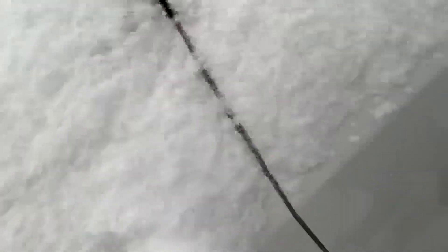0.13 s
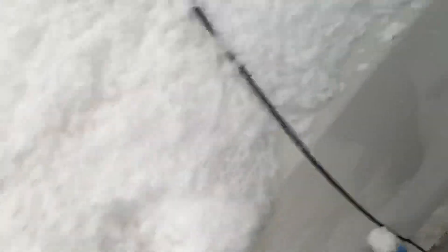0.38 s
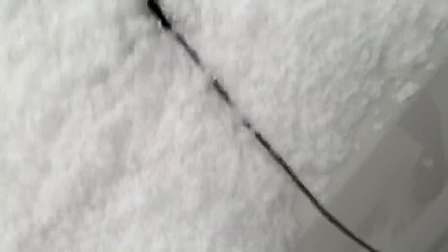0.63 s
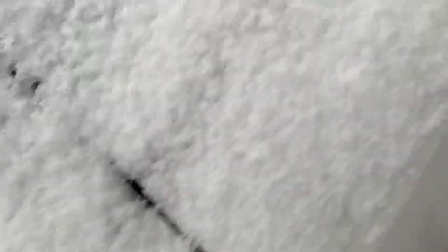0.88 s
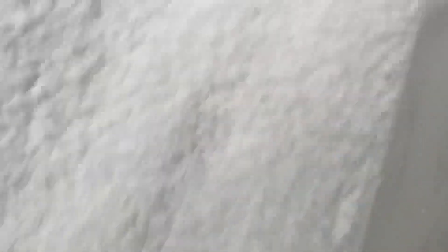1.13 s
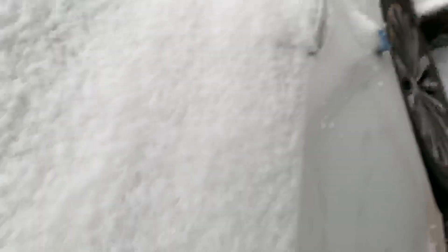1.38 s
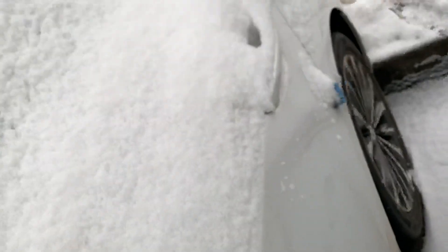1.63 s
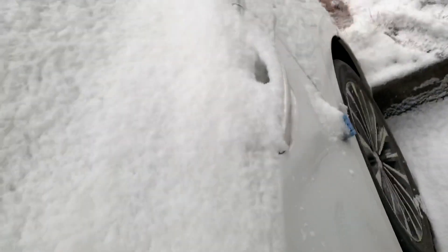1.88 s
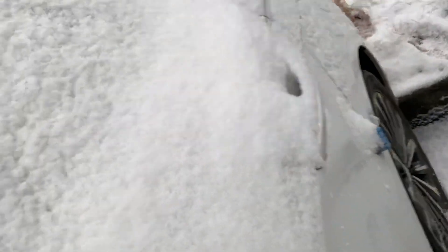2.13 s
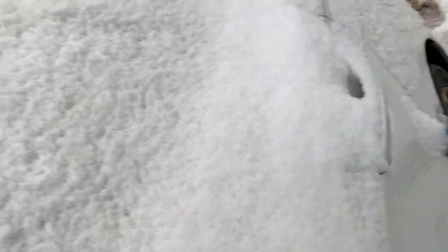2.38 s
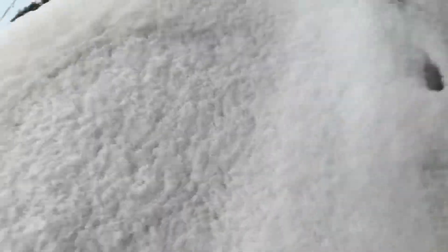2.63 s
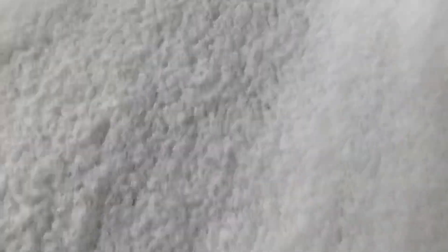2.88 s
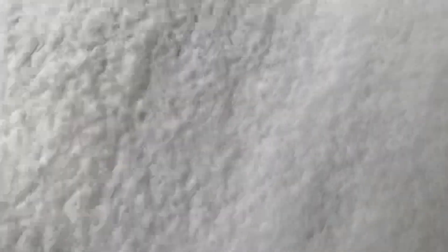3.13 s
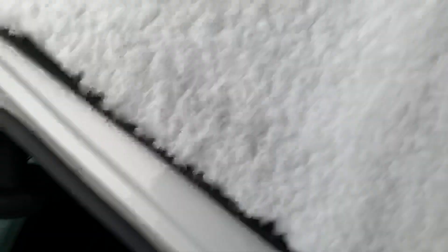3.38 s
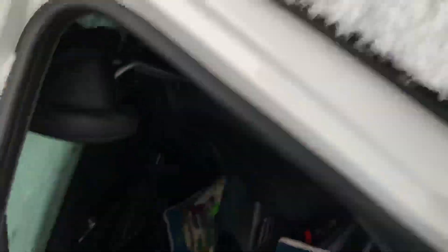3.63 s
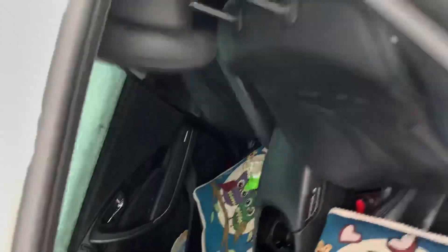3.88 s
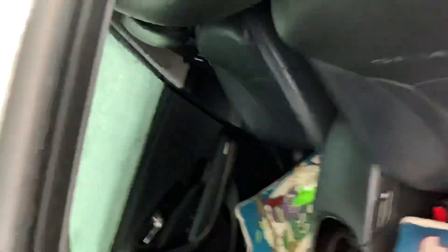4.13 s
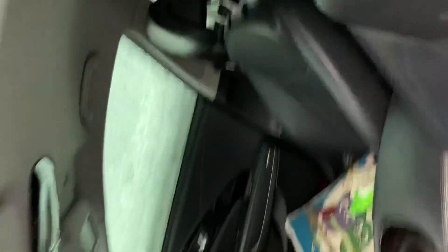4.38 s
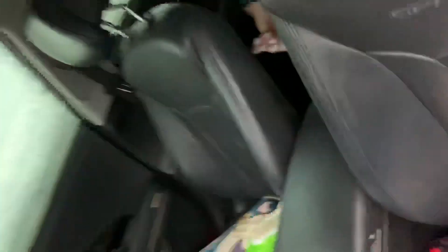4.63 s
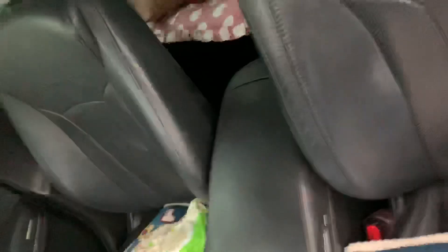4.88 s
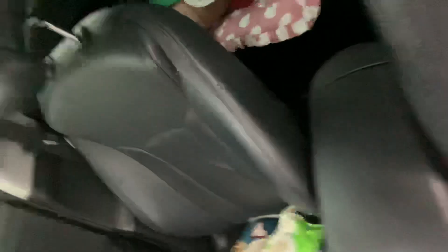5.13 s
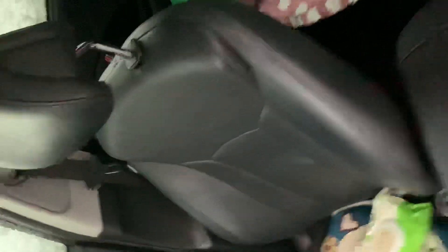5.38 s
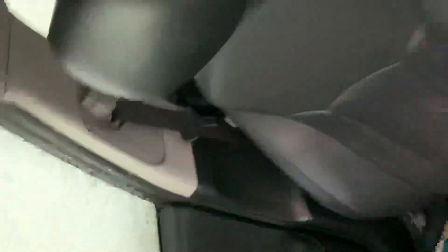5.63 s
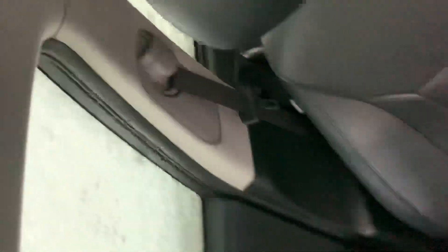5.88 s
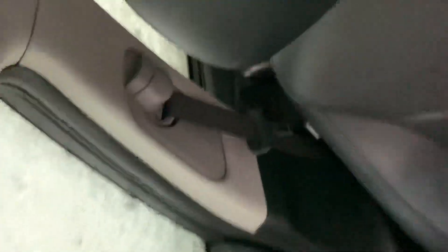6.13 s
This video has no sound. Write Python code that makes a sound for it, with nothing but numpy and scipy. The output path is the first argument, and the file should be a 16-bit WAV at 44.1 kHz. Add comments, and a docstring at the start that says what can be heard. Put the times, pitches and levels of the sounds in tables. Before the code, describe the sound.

Frozen car door pops loose with a loud crack and thump, then cloth rustling, faint clicks, and later two more dull, heavy thuds.

```python
"""Beside a frosted car, a hand-held phone hears the door knocked and cracking free of its icy seal.
Ice, snow and latch make bursts of crackle that ring the door's trim and panel.
The car body rings in deep thumps, some built from several parts.
A winter jacket rustles (shaped noise with a moving colour) over a far low rumble (noise in low resonances)."""
import sys
import numpy as np
from scipy import signal
from scipy.fft import rfft, irfft
from scipy.io import wavfile
from scipy.ndimage import uniform_filter1d, map_coordinates

SR = 44100
rng = np.random.default_rng(int(sys.argv[2]) if len(sys.argv) > 2 else 0)


def generate_wav(signal):
    """Clip the signal to [-1, 1] and save it as 16-bit WAV at the path in sys.argv[1]."""
    frames = np.transpose(np.atleast_2d(signal))
    scaled = np.clip(frames, -1, 1) * 32767
    pcm = np.round(scaled).astype(np.int16)
    wavfile.write(sys.argv[1], SR, pcm)


def invert_db(level):
    """Linear amplitude ratio for a level in decibels (20 dB per decade), elementwise."""
    return 10 ** (np.asarray(level, dtype=float) / 20)


N = 275757  # samples in the scene

# far rumble before it wavers: t/s, low level/dB, upper murmur level/dB
RUMBLE = [(0.0, -38, -50), (1.06, -39.5, -51), (1.44, -43.5, -47), (1.67, -39.5, -44), (1.83, -32.5, -41),
          (2.16, -39.5, -52), (3.93, -42, -47.5), (4.42, -45, -50), (4.77, -45, -56), (5.36, -47.5, -54.5),
          (5.52, -44, -53), (6.25, -48.5, -65)]
# resonances of the low rumble: f/Hz, width/Hz, level/dB
RUMBLE_PEAKS = [(34.1, 24, -1.5), (56.9, 11, 10.5), (96, 62, -0.5), (137, 53, -12)]
# resonances of the upper murmur: f/Hz, width/Hz, level/dB
MURMUR_PEAKS = [(190.4, 106, -0.5), (317, 180, -6.5), (454.5, 114, -3)]
# jacket before it flickers: t/s, rubbing level/dB, dull folds over swish/dB, bright hiss level/dB
JACKET = [(0.0, -56, 2, -63), (0.28, -48.5, -15.5, -55), (0.42, -54.5, -1, -66), (0.58, -48, -4.5, -48),
          (0.71, -49.5, -5.5, -55), (0.78, -47, -6, -55), (0.92, -53.5, -8.5, -55), (1.06, -59, 1, -56),
          (1.22, -64, 3.5, -73), (1.64, -66.5, 6.5, -66.5), (1.76, -46, 6.5, -82), (1.98, -61.5, -2, -53),
          (2.65, -58, -2, -53.5), (2.87, -66, 6.5, -70), (3.3, -50.5, -5, -56.5), (3.45, -50.5, -5, -51.5),
          (3.69, -51, -7.5, -59.5), (4.09, -53.5, -2.5, -57.5), (4.46, -49.5, -1, -43.5),
          (4.74, -57.5, -3.5, -62), (5.15, -57.5, -2.5, -65.5), (5.22, -57, 7, -55.5),
          (5.36, -52, -6.5, -63), (5.46, -45.5, 1.5, -54), (5.66, -51.5, -4, -78), (5.86, -49, 0, -76),
          (6.02, -53.5, -5, -71), (6.25, -66, -8, -67)]
# colour of the dull folds: f/Hz, relative level/dB per Hz
FOLDS_COLOUR = [(400, -0.5), (700, 7.5), (1500, 0), (2500, -4), (5000, -29.5), (9000, -47)]
# colour heard in the swish, with a steep end near 14.5 kHz that is not the cloth's own:
# f/Hz, relative level/dB per Hz
SWISH_COLOUR = [(1200, -14), (2500, -8.5), (4500, -6.5), (6500, -5), (7500, -9.5), (11000, -9.5),
                (13500, -7), (14400, -17), (14800, -49.5)]
# colour heard in the hiss, its steep top end not the cloth's own either: f/Hz, relative level/dB per Hz
HISS_COLOUR = [(6000, -56), (7700, -11.5), (8200, -2), (9500, -5), (10800, -10), (12000, -10),
               (14000, -54.5)]
# moving resonance of a sliding sleeve: t/s, centre f/Hz, lift/dB
SLIDE = [(0.0, 5000, -6.5), (0.55, 1960, 5), (0.62, 5170, 3.5), (0.78, 3840, 1.5), (1.2, 2900, 0.5),
         (3.4, 1190, -0.5), (3.6, 2000, 1), (3.74, 3670, 4), (4.1, 3440, 4), (4.24, 1850, -4),
         (4.38, 2120, 9), (4.44, 3900, 1), (4.6, 3320, 0.5), (5.35, 2880, 5), (5.52, 3360, 5),
         (5.68, 4000, 9.5), (5.76, 3540, 3), (5.79, 1500, 7.5), (5.949, 1930, -0.5)]
# how alike left and right are in the noises all around: f/Hz, likeness/-1 to 1
LIKENESS = [(60, 0.93), (130, 0.92), (290, 0.16), (640, -0.54), (1410, -0.28), (3100, 0.099),
            (6820, 0.0024), (15000, -0.034)]
# ticks of small latch parts, each near one pitch: t/s, peak level/dB, centre f/Hz, crackle length/ms
TICKS = [(0.0433, -17, 3900, 1), (1.4372, -12, 2670, 4), (1.4395, -11.5, 4040, 4.7),
         (1.718, -30, 1700, 2.2), (1.769, -28, 1660, 3.4), (1.795, -20, 3400, 1.1), (1.796, -23, 1980, 3.1),
         (1.819, -23, 1940, 2.7), (1.852, -27, 1490, 3), (1.898, -25, 4370, 2), (3.321, -40.5, 1240, 2),
         (3.448, -44, 1500, 5.8), (3.85, -41, 1370, 5), (4.408, -41, 1130, 2.4)]
# knocks on door and latch, and one faint dull rub on the panel (near 5 s):
# t/s, trim peak level/dB, panel over trim/dB, hardness/dB per octave, crackle length/ms
KNOCKS = [(0.0443, -18, 3.5, -12.5, 3.6), (0.355, -31, 5, -25, 3.1), (0.483, -32.5, -10, -10.5, 5.1),
          (0.611, -35, -10, -5.5, 2), (0.787, -31.5, -10, -6.5, 1.8), (1.397, -34, -7, -5, 5.9),
          (1.437, -6.5, -13, -10, 2.4), (1.4411, -15.5, 2, -14, 7.9), (1.455, -20.5, 3, -23, 15),
          (1.514, -21, -3.5, -35, 6.6), (1.771, -25, -10, -12, 7.1), (1.786, -21.5, -9, -6.5, 5.1),
          (1.798, -12.5, -11.5, -15, 4.5), (1.898, -15, -8, -12.5, 2.6), (2.183, -29, -17, -9, 8.7),
          (2.596, -32.5, -14, -9, 1.5), (3.262, -24.5, -20, -6, 6.2), (3.486, -36, -9, -30, 2.4),
          (3.552, -34.5, -13, -27, 4.4), (3.691, -36, -24, -2.5, 2.2), (3.786, -26.5, -1, -14, 4.6),
          (3.799, -26.5, -21, -24, 3), (4.251, -36.5, 0.5, -18, 2.8), (4.378, -33.5, -19, -12, 2.9),
          (4.975, -49, 11.5, -24, 30), (5.396, -21, 4.5, -12, 3.2), (5.402, -20, -4.5, -12, 14),
          (5.479, -36, 3, -3, 5.5), (5.785, -36, -17, -9, 17)]
# parts of deep thumps; a thump may take several rows, skin or frame first, shell after:
# t/s, peak level/dB, skin over shell/dB, frame over shell/dB, damping/factor
THUMPS = [(0.05, -25, 2.5, -8, 4), (1.469, -25, -4, 30, 2.7), (1.489, -22.5, -2, 18, 0.78),
          (1.513, -20.5, -0.5, 9.5, 0.68), (1.8, -15, 4, 31, 0.72), (1.819, -12.5, 1, 3, 1.7),
          (1.909, -21.5, -1, 7.5, 2), (1.939, -23, -13, -26, 1.5), (2.863, -31, 13, 18.5, 0.18),
          (5.031, -21, -8, 13, 0.65), (5.044, -18.5, 9, 7, 3), (5.063, -29, 13, 16, 0.89),
          (5.077, -20.5, 3, 4.5, 1.4), (5.093, -26.5, 12.5, 10, 2.4), (5.406, -17, 33, 6, 1.64),
          (5.425, -12.5, -20, -27, 0.98), (5.478, -24.5, 11, 9, 1.5), (5.508, -23.5, -17, -8, 0.45),
          (5.559, -23.5, -12, -9, 0.84)]
# snow and ice scraping off: t/s, trim peak level/dB, hardness/dB per octave, swell/ms, fade/ms
SCRAPES = [(0.257, -28, -9, 11, 13), (0.291, -35.5, -24, 21, 7.8), (0.435, -35.5, -15, 14, 6.3),
           (0.539, -37, -12, 6.7, 20), (0.587, -36.5, -8, 7.5, 14), (1.456, -37.5, 0, 3.9, 44),
           (1.523, -24, -8.5, 22, 23), (1.831, -22.5, -10.5, 55, 37), (1.874, -33, -15, 28, 37),
           (1.919, -30, -16, 15, 11), (2.827, -31, -5.5, 1.5, 38), (2.876, -24, -5, 13, 10),
           (3.19, -36.5, -25, 15, 14), (3.434, -36, -28, 11, 14), (3.453, -38.5, -26, 4.9, 11),
           (3.519, -29, -6.5, 14, 16), (3.801, -32.5, -9.5, 33, 16), (4.289, -35, -9.5, 55, 11),
           (4.331, -44, -24, 23, 4.3), (4.375, -33, 1.5, 25, 20), (5.047, -31.5, -7, 12, 8.8),
           (5.069, -35.5, -9, 8.8, 8.7), (5.42, -28.5, -4.5, 18, 30), (5.531, -36.5, -7, 41, 51)]
# bright cracks of ice: t/s, trim peak level/dB, treble over trim/dB, crackle length/ms
CRACKS = [(1.423, -23.5, -8.5, 8.8), (1.4345, -8, 2, 10.2), (1.54, -24, 4, 8.6), (1.702, -24.5, -10, 5.1),
          (1.722, -27, -4, 5.1), (1.762, -31.5, 11.5, 2.6), (1.968, -35.5, -12, 27),
          (2.421, -39, 15.5, 2.6), (3.075, -42.5, 14, 6), (5.395, -25, 9.5, 6.2), (5.414, -26, -19.5, 7.5)]
# door panel modes: f/Hz, level/dB, time to fall 60 dB at damping 1/s
PANEL = [(279, -1, 0.064), (359, -12, 0.0795), (450.6, 10, 0.019), (518.3, -3, 0.048), (583, -16, 0.026),
         (665, -10, 0.047), (785, -26.5, 0.073), (920, -18, 0.051)]
# door frame modes: f/Hz, level/dB, time to fall 60 dB at damping 1/s
FRAME = [(192.7, 9, 0.047), (218, -20.5, 0.17), (246.3, -0.5, 0.036)]
# car shell modes: settled f/Hz, level/dB, time to fall 60 dB at damping 1/s
SHELL = [(46, 2.7, 0.26), (51.1, 23.6, 0.07)]
# door skin modes: f/Hz, level/dB, time to fall 60 dB at damping 1/s
SKIN = [(78, 1.1, 0.035), (102.7, 6.9, 0.14), (132.5, 3, 0.038)]
# how much later a crackle reaches the left microphone as the phone turns: t/s, lag/ms
LEFT_LAG = [(0.043, -0.42), (0.26, 0.88), (1.436, -0.089), (1.6, -0.5), (1.9, -0.098), (2.6, -0.63),
            (2.87, 0.43), (3.794, 0.724), (4.376, -0.8), (5.043, -0.91), (5.396, 0.69)]
# colour of the left microphone against the right: f/Hz, left minus right/dB
LEFT_COLOUR = [(60, -1.5), (110, -1), (200, -2), (380, 1), (700, -0.5), (1290, -0.5), (2380, -0.5),
               (4400, 2.5), (8120, -5), (15000, -1)]
# narrow dip heard near 12 kHz on both sides: f/Hz, width/Hz, level/dB
NARROW_DIP = (11870, 610, -14.5)

SIZE = 2 ** 14  # samples in one short sound
KNOCK_RISE_MS, KNOCK_TREBLE_DB, KNOCK_GRAIN_DB = 1.1, -15, 4.5
BLOW = 0.7  # one clean blow, against the energy of the crackle around it
LEAD_S = 0.04  # room for a crackle to swell before its event
SLIDE_OCTAVES = 0.34  # half-width of the sleeve's resonance
PATCHY_DB = 1.96  # size of the random patches, before smoothing
SHELL_SAG, SHELL_SAG_S = 0.22, 0.015  # a struck shell starts sharp by this share, then settles


def unit(x):
    """Scale to an average (rms) level of 1."""
    return x / np.sqrt(np.mean(x ** 2))


def along(points, hz):
    """Read (Hz, value) points on a log-frequency axis."""
    at, value = np.transpose(points)
    return np.interp(np.log(hz + 1), np.log(at), value)


def curves(table):
    """The columns of a table at every sample."""
    s, *columns = np.transpose(table)
    return [np.interp(np.arange(N) / SR, s, column) for column in columns]


def walk(rate):
    """Random levels, rate of them a second, smoothed twice; rms 1."""
    hold = int(SR / rate)
    steps = np.repeat(rng.standard_normal(N // hold + 1), hold)
    smooth = uniform_filter1d(uniform_filter1d(steps, hold), hold)
    return unit(smooth[:N])


def grains(grain_db, shape):
    """Random gains, mostly small with rare big ones, that make noise grainy."""
    return invert_db(grain_db * np.minimum(rng.exponential(size=shape), 5))


def diffuse(gain, grain_db):
    """Grainy noise from all around, coloured by gain(Hz); two spaced microphones agree only in the bass."""
    hz = np.fft.rfftfreq(N, 1 / SR)
    like = np.clip(along(LIKENESS, hz), -0.99, 0.99)
    mid, side = rfft(rng.standard_normal((2, N)) * grains(grain_db, (2, N)))
    mid, side = mid * np.sqrt(1 + like), side * np.sqrt(1 - like)
    return unit(irfft(gain(hz) * np.array([mid + side, mid - side]), N))


def ring(modes, damping, sag=0):
    """Ringing of a set of modes, one a row; the lower a mode, the later it swells."""
    t = np.arange(SIZE) / SR
    hz, db, t60 = np.transpose(modes)[:, :, None]
    bent = t + sag * SHELL_SAG_S * (1 - np.exp(-t / SHELL_SAG_S))
    swell = 1 - np.exp(-t * hz / 4.24)
    decay = np.exp(-np.log(1000) * damping * t / t60)
    return invert_db(db) * swell * decay * np.sin(2 * np.pi * hz * bent)


def add(out, s, sound):
    """Mix a short sound in at time s."""
    i = int(s * SR)
    out[:, i:i + SIZE] += sound[..., :N - i]


def peak(spectrum, db):
    """Scale a spectrum so that the wave of each channel peaks at db."""
    return spectrum * invert_db(db) / np.abs(irfft(spectrum, SIZE)).max(axis=1, keepdims=True)


def rumble():
    """Distant engines and traffic: noise in a few low resonances, wavering."""
    def resonances(table):
        return lambda hz: sum(invert_db(db) / (1 + (2 * (hz - f) / width) ** 2) for f, width, db in table)

    low_db, upper_db = curves(RUMBLE)
    low = diffuse(resonances(RUMBLE_PEAKS), 0) * invert_db(low_db + 1.4 * walk(4.77))
    murmur = diffuse(resonances(MURMUR_PEAKS), 0) * invert_db(upper_db + 2.2 * walk(14))
    return low + murmur


def jacket():
    """Stiff cloth slides on itself: grainy noise, dull where it folds, bright where it brushes."""
    rubbing_db, folds_db, hiss_db = curves(JACKET)
    dull_db = rubbing_db + folds_db + 1.5 * walk(6.6)
    swish_db = rubbing_db + 0.8 * walk(9)
    layers = [(dull_db, FOLDS_COLOUR, 5.0), (swish_db, SWISH_COLOUR, 2.5), (hiss_db, HISS_COLOUR, 1.5)]
    cloth = 0
    for db, colour, grain_db in layers:
        flicker_db = 1.2 * walk(35)
        cloth = cloth + diffuse(lambda hz: invert_db(along(colour, hz)), grain_db) * invert_db(db + flicker_db)
    return creases(cloth)


def creases(cloth):
    """Creases form and slip away: patches of the spectrum swell alone, and one broad resonance moves."""
    hz, t, z = signal.stft(cloth, SR, nperseg=512)
    octave = np.log2(hz + 100)[:, None]
    s, centre_hz, lift_db = np.transpose(SLIDE)
    distance = octave - np.interp(t, s, np.log2(centre_hz))
    lift = np.interp(t, s, lift_db) * np.exp(-(distance / SLIDE_OCTAVES) ** 2)
    # random patches: 3 to an octave, 16 to a second
    coarse = rng.standard_normal((32, 128))
    places = np.broadcast_arrays(3 * (octave - 6), 16 * t)
    patches = map_coordinates(coarse, places, mode="mirror")
    return signal.istft(z * invert_db(lift + PATCHY_DB * patches), SR, nperseg=512)[1][:, :N]


def iced_trim():
    """Iced trim and latch: a dense crowd of short-lived modes, the high ones shortest."""
    trim_hz = np.geomspace(560, 10000, num=80) * (1 + 0.014 * rng.standard_normal(80))
    t60_s = 0.022 * (1000 / trim_hz) ** 0.6
    spectra = rfft(ring(np.transpose([trim_hz, 0 * trim_hz, t60_s]), 1.0))
    return trim_hz, spectra / np.abs(spectra).max(axis=1, keepdims=True)


def crackle(rise_ms, fall_ms, grain_db, blow):
    """Breaking ice and snow: a swelling and fading burst of grainy noise, with a blow at its peak."""
    t, hz = np.arange(SIZE) / SR, np.fft.rfftfreq(SIZE, 1 / SR)
    length_ms = np.where(t < LEAD_S, max(rise_ms, 0.1), max(fall_ms, 0.3))
    fade = np.exp(-1000 * np.abs(t - LEAD_S) / length_ms)
    noise = rng.standard_normal((3, SIZE))
    # both microphones hear the same crackle, plus a part scattered to each alone
    burst = fade * grains(grain_db, SIZE) * (noise[0] + 2.2 * noise[1:])
    strength = blow * np.sqrt(np.mean(np.sum(burst ** 2, axis=1)))
    return rfft(burst) + strength * np.exp(-2j * np.pi * hz * LEAD_S)


def strike(out, trim, s, db, panel_db, treble_db, hardness_db, rise_ms, fall_ms,
           grain_db=KNOCK_GRAIN_DB, blow=BLOW, tick_hz=None):
    """A crackle rings trim and panel; a harder contact drives the high trim modes more."""
    hz = np.fft.rfftfreq(SIZE, 1 / SR)
    trim_hz, trim_spectra = trim
    push = crackle(rise_ms, fall_ms, grain_db, blow)
    # each mode is driven a little more or less by where the contact lands
    trim_drive = 1 + 0.25 * rng.standard_normal(len(trim_hz))
    panel_drive = 1 + 0.25 * rng.standard_normal(len(PANEL))
    if tick_hz is not None:
        trim_drive *= np.exp(-(np.log2(trim_hz / tick_hz) / 0.25) ** 2)  # width in octaves
    hardness = invert_db(hardness_db * np.log2(np.hypot(1, trim_hz / 1300)))
    bass_cut = np.hypot(1, 650 / trim_hz) ** 2
    trim_sound = (trim_drive * hardness / bass_cut) @ trim_spectra
    # a short tick is muffled by the snow; a long crackle frees the panel to ring
    panel_sound = panel_drive @ rfft(ring(PANEL, np.clip(9.5 / fall_ms, 0.8, 3)))
    bright = (hz / 10000) ** 3 / (1 + (hz / 10000) ** 3) / (1 + (hz / 15500) ** 30)
    both = peak(push * trim_sound, db) + peak(push * panel_sound, db + panel_db)
    both = both + peak(push.mean(axis=0, keepdims=True) * bright, db + treble_db)
    # half the lag delays the left, half advances the right
    lag_s = np.interp(s, *np.transpose(LEFT_LAG)) / 1000
    both = both * np.exp(-1j * np.pi * hz * np.array([[lag_s], [-lag_s]]))
    pan = invert_db(np.array([[0.2], [-0.2]]))  # dB, a touch to the left
    add(out, s - LEAD_S, pan * irfft(both, SIZE))


def ticks(trim):
    """Small latch parts tick, each ringing the trim near one pitch and hardly moving the panel."""
    out = np.zeros((2, N))
    for s, db, centre_hz, ms in TICKS:
        strike(out, trim, s, db, -28, KNOCK_TREBLE_DB, 0, KNOCK_RISE_MS, ms, tick_hz=centre_hz)
    return out


def knocks(trim):
    """Knocks on door and latch, and one faint dull rub: a crackle and its peak ring trim and panel."""
    out = np.zeros((2, N))
    for s, db, panel_db, hardness_db, ms in KNOCKS:
        strike(out, trim, s, db, panel_db, KNOCK_TREBLE_DB, hardness_db, KNOCK_RISE_MS, ms)
    return out


def thumps():
    """Parts of deep thumps: a soft push rings frame and skin first and, deeper and later, the shell."""
    out = np.zeros((2, N))
    push = np.hanning(int(0.0014 * SR))
    for s, db, skin_db, frame_db, damping in THUMPS:
        damping = max(damping, 0.3)
        shell = ring(SHELL, damping, SHELL_SAG).sum(axis=0)
        skin = ring(SKIN, damping).sum(axis=0)
        frame = ring(FRAME, damping).sum(axis=0)
        body = np.convolve(shell - invert_db(skin_db) * skin + invert_db(frame_db) * frame, push)[:SIZE]
        # the big body reaches the right microphone 0.6 ms after the left
        body = np.array([body, np.roll(body, int(0.0006 * SR))])
        add(out, s - 0.003, body * invert_db(db) / np.abs(body).max())
    return out


def scrapes(trim):
    """Snow and ice scrape off: a grainier crackle that swells and fades, with no clean blow."""
    out = np.zeros((2, N))
    for s, db, hardness_db, swell_ms, fade_ms in SCRAPES:
        strike(out, trim, s, db, -6, -14.5, hardness_db, swell_ms, fade_ms, grain_db=7.5, blow=0)
    return out


def cracks(trim):
    """Ice cracks: the same crackle and blow, each crack with its own share of treble."""
    out = np.zeros((2, N))
    for s, db, treble_db, ms in CRACKS:
        strike(out, trim, s, db, -9, treble_db, -7, KNOCK_RISE_MS, ms)
    return out


def scene():
    """Far rumble, jacket, door and body; all crackles ring the same trim."""
    trim = iced_trim()
    door = ticks(trim) + knocks(trim) + scrapes(trim) + cracks(trim)
    return rumble() + jacket() + door + thumps()


def low_pass(x):
    """Removes everything above the highest recorded frequency."""
    return signal.sosfilt(signal.butter(12, 16510, fs=SR, output="sos"), x)


def record(dry):
    """The two microphones colour the sound differently; a narrow dip near 12 kHz and a deep-bass cut follow."""
    hz = np.fft.rfftfreq(N, 1 / SR)
    tilt_db = along(LEFT_COLOUR, hz) / 2
    dip_hz, width_hz, dip_db = NARROW_DIP
    dip = invert_db(dip_db * np.exp(-((hz - dip_hz) / width_hz) ** 2))
    low_cut = (hz / 30) ** 2 / (1 + (hz / 30) ** 2)
    colour = invert_db(np.array([tilt_db, -tilt_db])) * dip * low_cut
    mix = irfft(rfft(dry) * colour, N)
    return low_pass(mix)


dry = scene()
out = record(dry)
generate_wav(out)
```